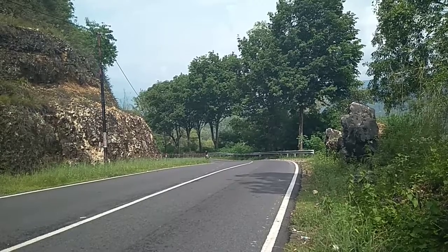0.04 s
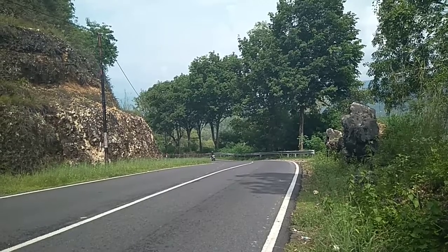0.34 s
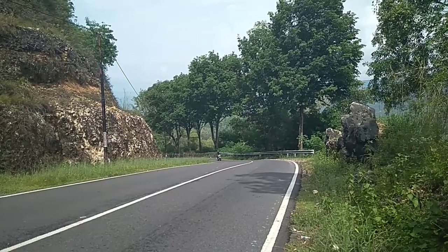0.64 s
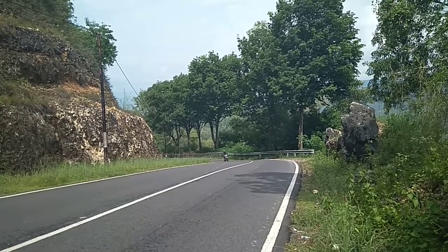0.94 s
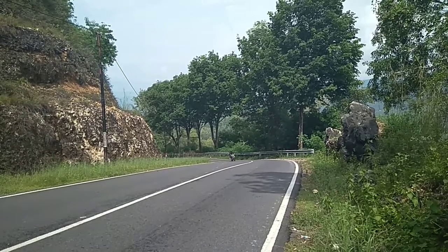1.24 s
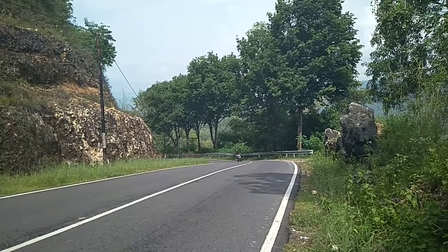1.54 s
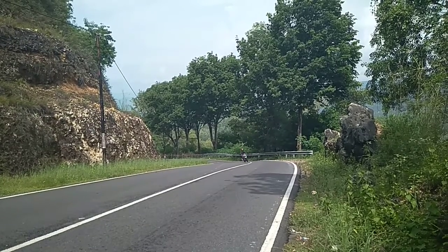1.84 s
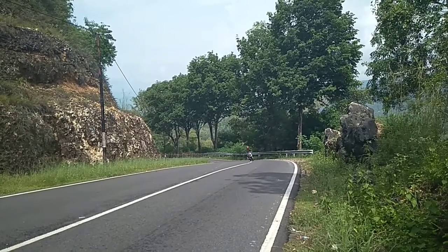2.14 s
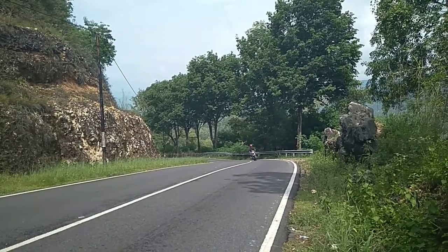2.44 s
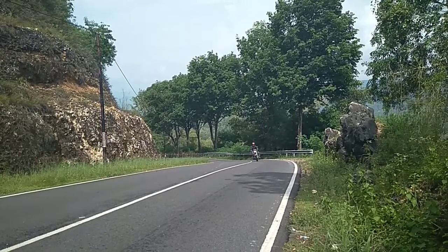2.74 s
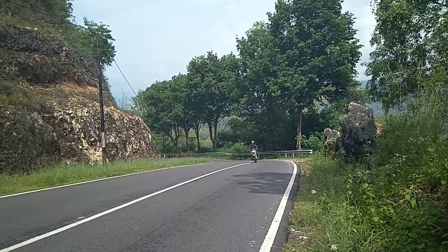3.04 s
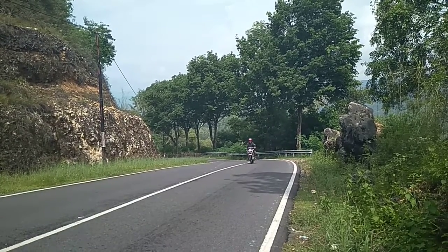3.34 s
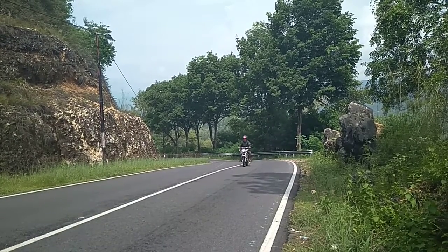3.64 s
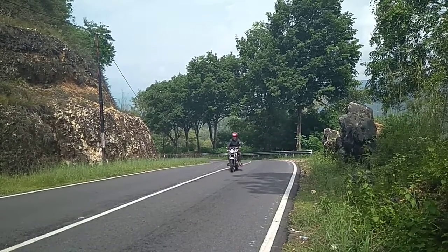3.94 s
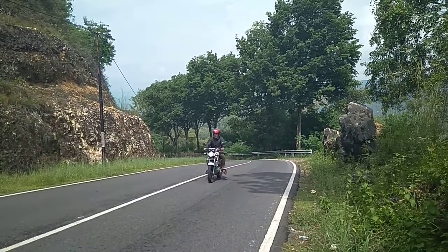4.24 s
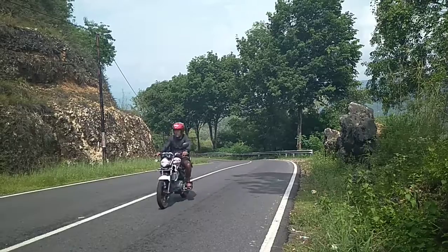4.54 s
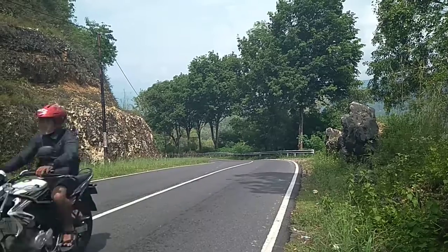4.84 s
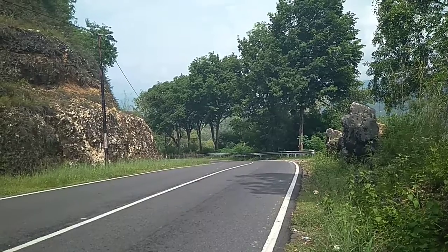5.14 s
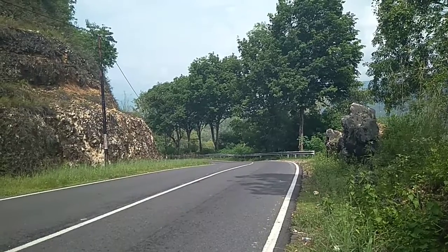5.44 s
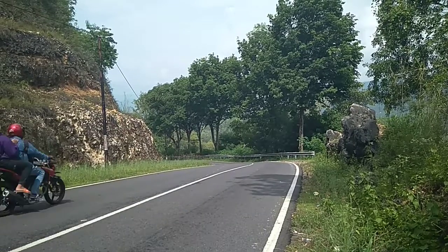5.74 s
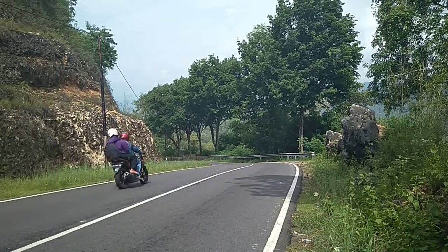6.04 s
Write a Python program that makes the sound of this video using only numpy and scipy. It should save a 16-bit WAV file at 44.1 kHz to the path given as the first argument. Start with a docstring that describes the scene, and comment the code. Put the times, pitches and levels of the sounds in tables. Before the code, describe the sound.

Heard in stereo from the verge of a country road, two motorcycle engines putter far off, slightly to the left, with insects singing faintly. The low, pulsing drone swells and turns raspy as it nears. Both bikes go by close, one just after the other, with booming exhausts, rattling, tyre hiss and a few clicks of grit. Valves tick briefly on the right, and the engines quickly fade.

```python
"""The edge of a hill road, a stereo microphone on the verge, insects singing faintly around it.
Two single-cylinder motorcycles round a far bend and pass close by in opposite directions,
moments apart, about five seconds in. Their exhausts, each a stack of orders (multiples of the
firing rate), throb against each other. Engine clatter, ticking valves and the hiss of chain
and tyres swell as they go by, and the sound drops quickly once they are past."""
import sys
import numpy as np
from scipy import signal
from scipy.fft import rfft, irfft, next_fast_len
from scipy.io import wavfile
from scipy.ndimage import map_coordinates

SR = 44100
rng = np.random.default_rng(int(sys.argv[2]) if len(sys.argv) > 2 else 0)


def store_pcm(level_fs):
    """Save levels as 16-bit WAV."""
    pcm = np.round(np.clip(level_fs, -1, 1) * 32767).astype(np.int16)
    wavfile.write(sys.argv[1], SR, np.atleast_2d(pcm).T)


N = 269053
TIME = np.arange(N) / SR
LEAVE_S, LEAVE_SPAN_S = 5.83, .03  # the bikes have gone by


def amp(db):
    return 10 ** (np.asarray(db) / 20)


def unit_rms(x):
    return x / np.sqrt(np.mean(x ** 2) + 1e-20)


def curves(rows):
    """The columns of a timed table, joined by straight lines at every sample."""
    times, *columns = np.transpose(rows)
    return [np.interp(TIME, times, column) for column in columns]


def step(s, span):
    """A soft change from 0 to 1 around a moment."""
    return .5 + .5 * np.tanh((TIME - s) / span / 2)


def arch(s, length):
    """Half a sine from a start, silent elsewhere."""
    return np.sin(np.pi * np.clip((TIME - s) / length, 0, 1))


def add(mix, s, sound):
    part = mix[:, round(s * SR):][:, :sound.shape[1]]
    part += sound[:, :part.shape[1]]


def panned(x, left_db):
    """Tilts a sound to the left and keeps the level of the middle."""
    sides = amp(np.array([[.5], [-.5]]) * left_db)
    return x * sides / sides.mean(0)


def wander(hz):
    """A smooth random drift of unit size that changes about hz times a second."""
    size = 4096
    rates = np.fft.rfftfreq(size, TIME[-1] / size)
    slow = irfft(rfft(rng.standard_normal(size)) * np.exp(-(rates / hz) ** 2), size)
    return np.interp(TIME, np.linspace(0, TIME[-1], size), unit_rms(slow))


def noise(colour, alike, count=N):
    """Stereo noise of a given spectrum; alike is the share of power common to both channels."""
    size = next_fast_len(count)
    hz, db = np.transpose(colour)
    log_bins = np.log(np.fft.rfftfreq(size, 1 / SR) + 1)
    gain = amp(np.interp(log_bins, np.log(hz), db, left=-70, right=-70))
    streams = irfft(rfft(rng.standard_normal((3, size))) * gain, size)[:, :count]
    return unit_rms(np.sqrt(alike) * streams[0] + np.sqrt(1 - alike) * streams[1:])


def band(hz, octaves):
    """One second of noise in a rounded band, 18 dB down that many octaves to either side."""
    colour = [(hz * 2 ** (u * octaves), -18 * u * u) for u in np.linspace(-1.5, 1.5, 13)]
    return noise(colour, alike=.55, count=SR)


def passing(s, width, db, fall_db, drop_db, bend_db=0, hold=0):
    """Level in dB of a source closest at s: it loses fall_db per tenfold distance and drops on leaving."""
    along = np.maximum(abs(TIME - s) - hold / 2, 0) / width  # in units of the closest distance
    in_bend = 1 - step(3.07, .05)
    screened_db = bend_db * in_bend + drop_db * step(LEAVE_S, LEAVE_SPAN_S)
    return db - fall_db * np.log10(np.hypot(1, along)) - screened_db


def puffs(cycles, depth, length, uneven=0):
    """A gain that jumps at each cycle, by uneven amounts if asked, and decays within the cycle."""
    strength = np.exp(uneven * np.clip(rng.standard_normal(1024), -2, 2))[cycles.astype(int)]
    return unit_rms(1 + depth * strength * np.exp(-(cycles % 1) / length))


def order(k, cycles, hz, pipe_hz=150, rough=.022, chambers=5, smeared=1):
    """One exhaust harmonic: it lags through the silencer's chambers and shakes with uneven burning."""
    ratio = k * hz / pipe_hz
    lag = chambers * np.arctan2(ratio / 2, 1 - ratio ** 2)
    # reflections in the silencer and off the road smear the upper orders over the cycle
    smear = smeared * np.clip(k - 3, 0, 2) * rng.uniform(-np.pi, np.pi) / 2
    phase = 2 * np.pi * k * cycles - lag + smear
    shake = min(rough * k, 1)
    return np.sqrt(2) * (1 + shake * wander(26)) * np.sin(phase + shake * wander(6))


def verge():
    """Around the microphone: still air, a fading insect song, a short trill, sizzles and chirps."""
    # spectra of air, insects and sizzle: (frequency [Hz], level [dB])
    air_colour = [(20, -7), (60, 12), (150, 2), (300, -16.5), (500, -28), (900, -4.5), (2000, -38),
                  (3100, -29), (3450, -17), (3700, -32), (5000, -28), (8000, -38), (10400, -12),
                  (12500, -58), (16500, -42)]
    insect_colour = [(12800, -64), (13500, -9), (13850, 11), (14150, 2), (14700, -50)]
    sizzle_colour = [(8000, -32), (9800, -1), (12000, -6), (13000, 6), (16500, -4)]
    # the insect song's fade: (time [s], level [dB])
    insect_fade = [(0, -72), (1, -74.5), (2, -76.5), (3.2, -79)]
    # bursts of fine sizzle: (start [s], length [s], level [dB])
    bursts = [(3.44, .11, -57), (3.658, 0.11, -52), (3.737, 0.11, -53), (3.983, 0.13, -51), (4.22, .2, -53),
              (5.68, .14, -50)]
    # sharp high chirps: (start [s], peak [dB], pitch [Hz], length [s])
    calls = [(3.959, -40.5, 10080, .011), (3.975, -30.5, 9940, 0.0099), (3.985, -32, 10000, 0.007),
             (3.992, -37, 10120, .007), (4.001, -39, 9900, 0.0042), (5.194, -26, 9650, 0.0093),
             (5.203, -22, 9850, 0.0046), (5.212, -26, 9730, 0.0043)]
    air = amp(-67.5) * noise(air_colour, alike=.97)
    song = amp(curves(insect_fade)[0] + 1.2 * wander(9)) * noise(insect_colour, alike=.23)
    trill = amp(-71) * arch(1.91, .57) * noise([(9300, -25), (9900, 0), (10500, -25)], alike=.45)
    sizzle = noise(sizzle_colour, alike=.4) * sum(amp(db) * arch(s, length) for s, length, db in bursts)
    chirps = sum(amp(db) * arch(s, length) * np.sin(2 * np.pi * hz * TIME) for s, db, hz, length in calls)
    return panned(air, 6) + song + trill + panned(sizzle, 8.4) + panned(chirps, 6.4)


def ticks(rows, octaves, decay_s=.002):
    """Tiny impacts, each a band of noise that dies at once."""
    out = np.zeros((2, N))
    for s, db, hz in rows:
        add(out, s, amp(db) * np.exp(-TIME[:SR] / decay_s) * band(hz, octaves))
    return out


def grit():
    """Grit clicks on the road."""
    # clicks: (time [s], level [dB], centre [Hz])
    clicks = [(.612, -54, 800), (3.305, -48, 1700), (3.31, -47, 1700), (3.344, -48, 1800),
              (3.623, -46, 1500), (4.448, -37, 1800), (4.896, -29, 1400), (4.906, -27, 1400),
              (5.032, -30, 2700), (5.551, -39, 1500)]
    return ticks(clicks, octaves=1)


def valves(centre_hz=2900):
    """Valves tick to the right of the microphone as the engine goes by."""
    # valve strikes: (time [s], level [dB])
    strikes = [(5.506, -36), (5.527, -35), (5.547, -36), (5.629, -37), (5.671, -41), (5.694, -45),
               (5.712, -46), (5.753, -45), (5.794, -47), (5.834, -52)]
    return panned(ticks([(s, db, centre_hz) for s, db in strikes], octaves=1.1), left_db=-6)


def quieter_bike(swell_db):
    """A slower engine with sharper puffs that shifts gear, pulls briefly and eases off."""
    # engine speed: (time [s], firing rate [Hz])
    speed = [(0, 44.5), (2.2, 45.6), (2.95, 47), (3.08, 37.5), (3.55, 43.2), (4.1, 42.3), (5.35, 38.4),
             (6.1, 37.6)]
    # exhaust harmonics: (order, level [dB])
    harmonics = [(1, -20), (2, -17), (3, -4.5), (4, -4.5), (5, -14), (6, -23), (7, -20.5), (8, -20),
                 (9, -29), (10, -33)]
    hz, = curves(speed)
    cycles = np.cumsum(hz) / SR
    tone = sum(amp(db) * order(k, cycles, hz, pipe_hz=140, rough=.025, chambers=2, smeared=0)
               for k, db in harmonics)
    return tone * amp(passing(5.3, width=.35, db=-21.5, fall_db=37, drop_db=15, bend_db=9) + swell_db)


def chain_and_tyres(cycles, swell_db):
    """Chain and tyres hiss, pulsing lightly with the engine; their top fizz carries least far."""
    # spectra of hiss and fizz: (frequency [Hz], level [dB])
    hiss_colour = [(6500, -37), (8200, -11), (9300, -4.5), (10500, -1.3), (11300, -4.7), (12500, -19),
                   (14000, -32), (16500, -40)]
    fizz_colour = [(11000, -20), (12000, 0), (14000, -2), (16500, -5)]
    hiss_db = passing(5.06, hold=.86, width=.115, db=-31.2, fall_db=30.5, drop_db=6)
    fizz_db = passing(5.06, hold=.88, width=.115, db=-39.5, fall_db=36, drop_db=4.5)
    hiss = noise(hiss_colour, alike=.27) * amp(hiss_db) + noise(fizz_colour, alike=.2) * amp(fizz_db)
    return hiss * puffs(cycles, depth=.19, length=.3, uneven=.6) * amp(swell_db + .6 * wander(30))


def crank_rasp(cycles, swell_db):
    """A bright rasp at each crank turn, twice per firing."""
    # its spectrum: (frequency [Hz], level [dB])
    colour = [(1200, -21), (1900, 0), (2250, -2.5), (2700, 2.5), (3120, -5), (3450, -1), (3700, -7.5),
              (4200, -6.5), (4800, -8.5), (5800, -4.5), (6900, 0.5), (8000, -4.5), (10000, -4)]
    rasp = noise(colour, alike=.33) * puffs(2 * cycles, depth=.35, length=.23, uneven=.4)
    level_db = passing(5.02, width=.46, db=-35, fall_db=41, drop_db=11.5, bend_db=5.5)
    return rasp * amp(level_db + swell_db + 1.1 * wander(24))


def rattles(cycles):
    """Brief rattles and hisses that throb with the crank."""
    # noise surges: (start [s], length [s], level [dB], centre [Hz], half width [octaves])
    surges = [(0, .9, -73, 950, .09), (.17, .1, -73, 1500, .8), (.72, .15, -69.5, 880, .8),
              (.76, .09, -74, 1650, .7), (.95, .24, -72, 1550, .7), (1.24, .11, -70.5, 1700, .8),
              (1.45, .3, -66, 800, .6), (1.68, .17, -63.5, 850, .8), (1.72, .09, -70, 1650, .6),
              (2.2, 1, -73, 4000, .8), (2.95, .95, -68, 3500, .45), (2.73, .12, -69, 6300, .6),
              (3.05, .11, -63, 8600, .25), (3.11, .11, -58, 1600, .6), (3.2, .32, -55.5, 1700, .5),
              (3.27, .15, -60, 6500, .4), (3.4, .5, -53.5, 660, .35), (3.44, .04, -53, 1900, .4),
              (3.5, .4, -55, 1350, .7), (3.49, .13, -58, 6500, .4), (3.67, .22, -56, 6000, .5),
              (3.68, .04, -53, 10200, .25), (3.69, .035, -47, 850, .9), (3.9, .16, -57, 1350, .5),
              (3.99, .11, -51, 9900, .15), (4.03, .42, -52.5, 1100, .4), (4.48, .09, -45, 750, 1.2),
              (4.63, .05, -43, 1300, .7), (4.75, .13, -45, 520, .4), (4.79, .2, -35.5, 1350, .55),
              (4.95, .11, -39, 2600, .5), (5.05, .08, -33.5, 690, .12), (5.1, .2, -36, 2000, .55),
              (5.22, .1, -41, 700, .6), (5.38, .24, -46, 4400, .3), (5.71, .06, -52, 760, .3)]
    out = np.zeros((2, N))
    for s, length, db, hz, octaves in surges:
        add(out, s, amp(db) * arch(0, length)[:SR] * band(hz, octaves))
    return panned(out * puffs(2 * cycles, depth=.9, length=.3, uneven=.4), left_db=3.5)


def road_bounce(x, echo=.33, closest_lag_ms=1.1):
    """The bounce off the road comes later as the bike nears: its notches sweep down, then up again."""
    distance = np.hypot(1, (TIME - 5.03) / .22)  # 1 at the closest point
    late = TIME - closest_lag_ms / distance / 1000
    bounce = np.array([np.interp(late, TIME, channel) for channel in x])
    return (x + echo * bounce) / np.hypot(1, echo)


def tailpipe(cycles, hz):
    """The open pipe picks out a few orders and whistles hollowly."""
    # the whistle: (order, level [dB])
    harmonics = [(11, -8), (12, -13), (13, -6), (14, 0), (15, -8), (16, -12), (17, -13)]
    # its breathy part: (frequency [Hz], level [dB])
    colour = [(400, -18), (480, -27), (540, -14), (590, -9), (680, 2.5), (730, -7), (830, -13), (1100, -29)]
    whistle = unit_rms(sum(amp(db) * order(k, cycles, hz) for k, db in harmonics))
    return .7 * whistle + .7 * noise(colour, alike=.7)


def engine_clatter(cycles, hz, behind, swell_db):
    """The casing rings and rattles at each firing: more ring from far off, more rattle close by."""
    # casing overtones: (order, level [dB])
    casing = [(12, -18), (13, -12), (14, -12), (15, -14.5), (16, -16), (17, -11), (18, -13), (19, -15),
              (20, -17), (21, -17.5), (23, -22), (25, -22), (27, -21), (28, -19), (38, -21), (41, -21)]
    # spectrum of the rattle: (frequency [Hz], level [dB])
    colour = [(380, -1.5), (520, -7), (700, -.7), (950, -3.7), (1300, 0), (1950, -2.5), (2800, -14.5),
              (4000, -19)]
    ring = np.zeros(N)
    for k, db in casing:
        gain = amp(db + 3 * wander(7))
        ring += gain * np.cos(2 * np.pi * (k * cycles + rng.random()) + .4 * wander(12))
    rattle = noise(colour, alike=.55) * puffs(cycles, depth=.95, length=.3, uneven=.4)
    ring_share = np.interp(TIME, [1.8, 3.1, 4.2, 4.7], [.6, .3, .27, .14])
    clatter = np.sqrt(1 - ring_share) * rattle + np.sqrt(ring_share) * unit_rms(ring)
    # from behind the tailpipe takes over, until the rock face throws the clatter back
    pipe_share = np.clip(.95 * behind ** 1.58 - .35 * step(LEAVE_S, LEAVE_SPAN_S), 0, 1)
    clatter = np.sqrt(1 - pipe_share) * clatter + np.sqrt(pipe_share) * tailpipe(cycles, hz)
    level_db = passing(5.02, width=.22, db=-31.1, fall_db=32, drop_db=5.5)
    return road_bounce(clatter) * amp(level_db + swell_db + 1.2 * wander(12))


def exhaust_chuff(cycles, level_db):
    """Each firing pushes out a puff of low noise."""
    # its spectrum: (frequency [Hz], level [dB])
    colour = [(25, -13), (60, 1), (130, 0.5), (300, 4), (420, -23), (600, -30), (1000, -31)]
    return amp(level_db) * noise(colour, alike=.15) * puffs(cycles, depth=.98, length=.22)


def exhaust_bark(cycles, hz, level_db, behind):
    """The middle orders change colour as the bike nears and sharpen once the pipe points back."""
    # the bark by position: (order, far off [dB], down the straight [dB], alongside [dB], behind [dB])
    harmonics = [(4, -28, -8, -7.5, -.5), (5, -5, -4, -2.5, -10), (6, -9, -16.5, -11, -5.5),
                 (7, -5.5, -15.5, -13.5, -17), (8, -10.5, -20, -16, -31), (9, -17, -24, -24, -48),
                 (10, -23, -32, -23.5, -55), (11, -32, -36, -30, -38)]
    # brighter moments: (start [s], length [s], tilt [dB per order])
    bright = [(3.74, .12, 4), (3.92, .13, 5.5), (4.1, .15, 4.5)]
    straight = np.interp(TIME, [1.9, 2.7], [0, 1])
    beside = np.interp(TIME, [4.15, 4.45], [0, 1])
    tilt_db = sum(db * arch(s, length) for s, length, db in bright)
    bark = np.zeros(N)
    for k, far_db, straight_db, beside_db, behind_db in harmonics:
        colour_db = far_db + straight * (straight_db - far_db)
        colour_db += beside * (beside_db - straight_db) + behind * (behind_db - beside_db)
        colour_db += tilt_db * (min(k, 8) - 6)
        fading_db = 1.3 * wander(5)  # echoes from the rock face fade each order in and out
        bark += amp(level_db + colour_db + fading_db) * order(k, cycles, hz, smeared=1 - behind)
    return bark


def exhaust(cycles, hz, behind, boom_swell, drone_swell, bark_swell, boom_left_db, bark_left_db):
    """The louder bike's silencer: thud, boom and drone on orders 1 to 3, with chuff and bark."""
    thud_db = passing(5.22, hold=.12, width=.45, db=-33.5, fall_db=36, drop_db=8, bend_db=8.5)
    boom_db = passing(5.1, width=.2, db=-13, fall_db=34, drop_db=6, bend_db=1.5)
    drone_db = passing(5.04, width=.22, db=-15.5, fall_db=40, drop_db=10, bend_db=1)
    bark_db = passing(5.2, width=.46, db=-23.7, fall_db=44.5, drop_db=10)
    thud_db += .55 * boom_swell
    boom_db += boom_swell + .7 * wander(6)
    drone_db += drone_swell + 1.3 * wander(13)
    chuff = exhaust_chuff(cycles, bark_db + .3 * boom_swell - 9)
    lows = sum(amp(db) * order(k, cycles, hz) for k, db in enumerate([thud_db, boom_db, drone_db], 1))
    bark = exhaust_bark(cycles, hz, bark_db + bark_swell, behind)
    lows *= 1 + .15 * wander(25)
    bark *= 1 + .12 * wander(22)
    return panned(lows + chuff, boom_left_db) + panned(bark, bark_left_db)


def scene():
    """Both bikes over the verge; the left channel's lag follows the louder bike's bearing."""
    # the louder bike's engine speed: (time [s], firing rate [Hz])
    speed = [(0, 46.6), (.7, 47.7), (1.5, 48.5), (3.7, 48.55), (4, 48.9), (4.3, 49.6), (4.6, 50.2),
             (4.95, 50.5), (5.15, 49.2), (5.37, 48.15), (5.65, 48.8), (6.1, 49.7)]
    # brief swells and sags: (start [s], length [s], boom [dB], drone [dB], bark [dB], clatter [dB])
    swells = [(0, .35, 0, 0, 3, 0), (.44, .14, 0, 3, 7, 0), (.86, .3, -1, -1, -3, -2),
              (1.24, .6, -1, -1, -3, 1.5), (1.87, .73, 1.5, -1, -3.5, -2.5), (2.05, .08, 0, 2, 6, 0),
              (2.29, .07, 0, -9, -3, 0), (2.36, .14, 12, 6, -3, 0), (2.51, .08, 0, -6, -4, 0),
              (2.65, .14, 1, 6, 5, .5), (2.82, .1, -18, 6, -1, -2), (2.95, .1, -6, 7, 8, -2.5),
              (3.07, .1, 0, -8, -6, 1), (3.2, .2, -5, 2.5, -1, 2), (3.45, .17, 11.5, 13, 2, 2.5),
              (3.63, .21, 11, 5, 3.5, 4), (3.84, .07, 5, 0, -5, 1), (3.95, .11, -6, 2, .5, -2.5),
              (4.1, .34, 6, 2, .5, -1.5), (4.47, .11, -1, -2, 3, 3), (4.77, .07, -7, 7, 0, 1),
              (4.96, .04, 0, -4, 0, 0), (5.01, .08, 1.5, 1, 0, 0), (5.1, .04, 0, -7, -1, -1),
              (5.15, .08, 0, 4, 0, 1), (5.25, .07, 0, -3, 0, 0), (5.35, .17, -4, -1, 0, -1),
              (5.58, .16, 1, 3, 2, -1.5)]
    # left channel over right: (time [s], hiss [dB], rasp [dB], bark [dB], boom [dB])
    balance = [(0.0, 3.5, 2.5, 4.5, 5.0), (1.92, 5.5, 2.5, 6.0, 6.0), (2.51, 5.0, 4.0, 3.0, 1.5),
               (3.01, 6.5, 5.0, 6.0, 5.5), (3.11, 12.5, 7.0, 5.5, 10.0), (3.43, 6.5, 5.5, 7.0, 5.5),
               (3.5, 7.5, 4.5, 3.0, 3.5), (3.8, 10.0, 5.0, 4.0, 3.0), (4.01, 4.0, 6.0, 9.5, 5.5),
               (4.25, 3.5, 5.0, 9.5, 6.0), (4.33, -5.5, 3.5, 4.5, 1.5), (4.57, 6.0, 7.5, 6.5, 9.5),
               (4.67, 5.0, 5.0, 4.0, -0.5), (5.08, 7.5, 2.5, 3.5, 2.5), (5.18, 2.5, 2.5, 3.5, 3.5),
               (5.33, 11.0, 3.0, 0.5, -3.0), (5.49, 4.0, -0.5, 3.5, -1.5), (5.67, -10.5, -8.5, 1.0, -4.0),
               (5.71, -6.0, -9.5, 4.0, -8.5), (5.78, -8.5, -8.0, -0.5, -7.0), (5.95, 3.5, 3.5, 5.5, 6.0),
               (6.1, 3.5, 2.0, 5.0, 5.0)]
    # uneven surges of the treble: (time [s], hiss [dB], rasp [dB])
    treble = [(2.9, -.5, -1), (3.15, 1, .5), (3.85, 1, 1), (3.95, -3, -3), (4.17, -4, -2.5), (4.28, 1, 0),
              (4.33, -.5, 0), (4.37, 3, 1), (4.41, 0, 0), (4.45, 2.5, 1), (4.49, -1.5, 0), (4.56, 1.5, 1),
              (4.8, 1, .5), (5.1, 0, -.5), (5.5, 0, 0), (5.66, -1.5, -2), (5.86, -2, -3), (6.1, 0, -1)]
    hz, = curves(speed)
    cycles = np.cumsum(hz) / SR
    boom_swell, drone_swell, bark_swell, clatter_swell = sum(
        np.outer(dbs, step(s, span=.017) - step(s + length, span=.017)) for s, length, *dbs in swells)
    hiss_left_db, rasp_left_db, bark_left_db, boom_left_db = curves(balance)
    hiss_db, rasp_db = curves(treble)
    beside = step(4.87, .11)  # the louder bike swings from ahead to the side
    behind = step(5.3, .08)  # then its pipe points back at the microphone
    bikes = exhaust(cycles, hz, behind, boom_swell, drone_swell, bark_swell, boom_left_db, bark_left_db)
    bikes += panned(quieter_bike(.7 * drone_swell), boom_left_db)
    bikes += panned(engine_clatter(cycles, hz, behind, clatter_swell), 3.4 + .06 * rasp_left_db)
    bikes += panned(crank_rasp(cycles, rasp_db + .7 * clatter_swell), rasp_left_db)
    bikes += panned(chain_and_tyres(cycles, hiss_db + .3 * clatter_swell), hiss_left_db)
    left, right = bikes + rattles(cycles) + grit() + valves()
    lag_ms = -.035 * (1 - beside) + .34 * beside
    left = map_coordinates(left, [np.arange(N) - lag_ms * SR / 1000], order=5, mode="nearest")
    return np.array([left, right]) + verge()


def record(dry):
    """The recorder's band limit: a steep cut of the highest treble."""
    edge_hz = 15850
    lowpass = signal.firwin(511, edge_hz, window=("kaiser", 9), fs=SR)
    return signal.oaconvolve(dry, lowpass[None], "same")


dry = scene()
out = record(dry)
store_pcm(out)
```